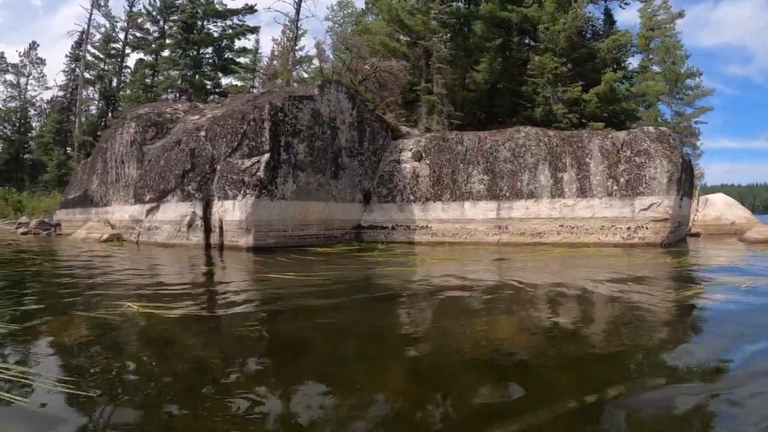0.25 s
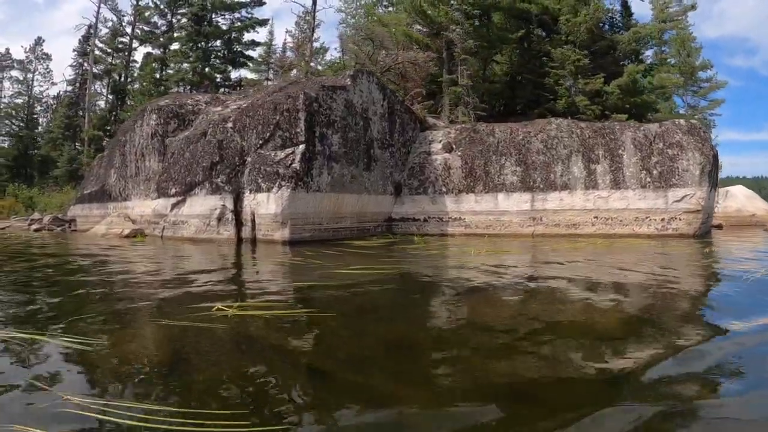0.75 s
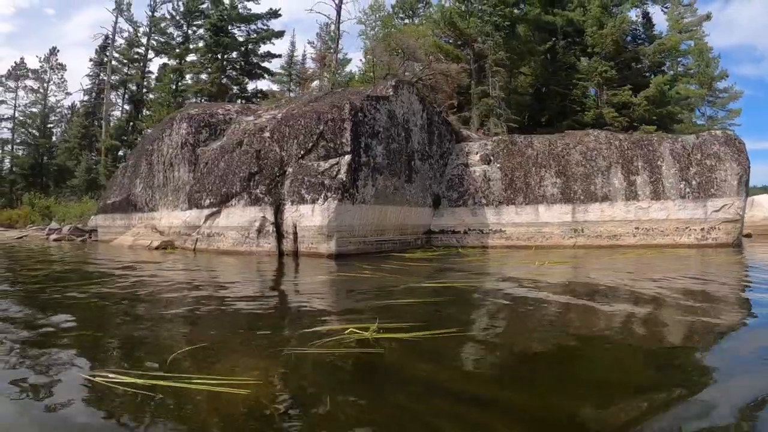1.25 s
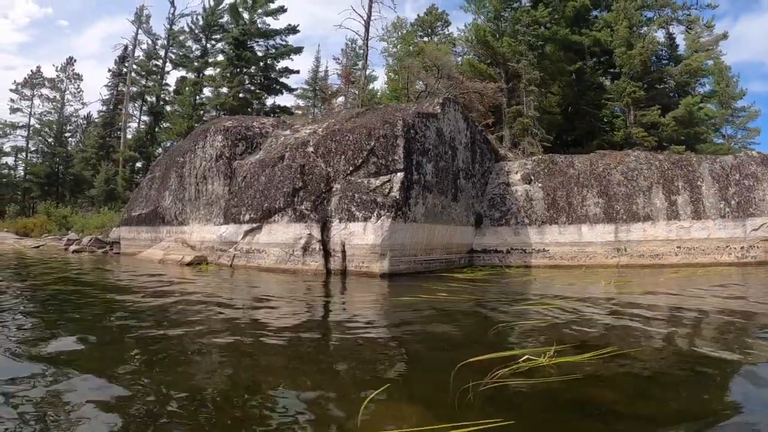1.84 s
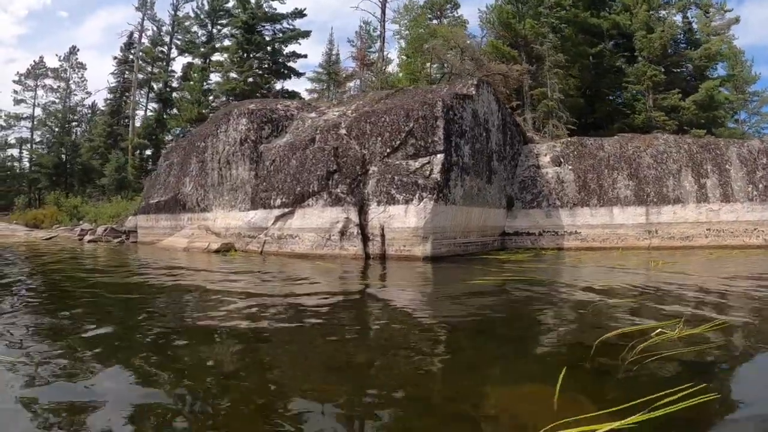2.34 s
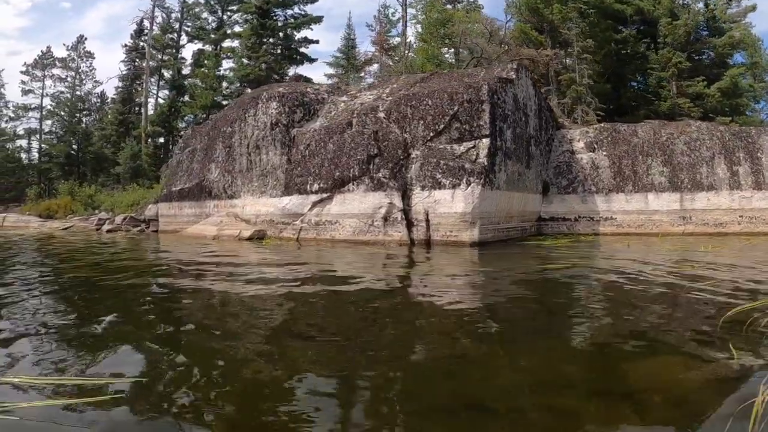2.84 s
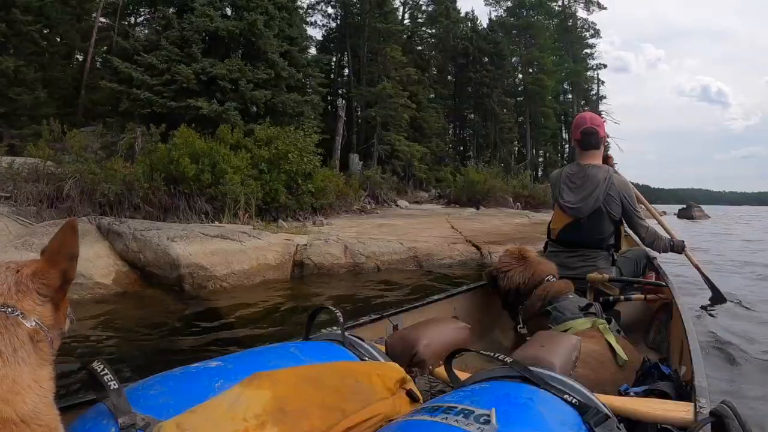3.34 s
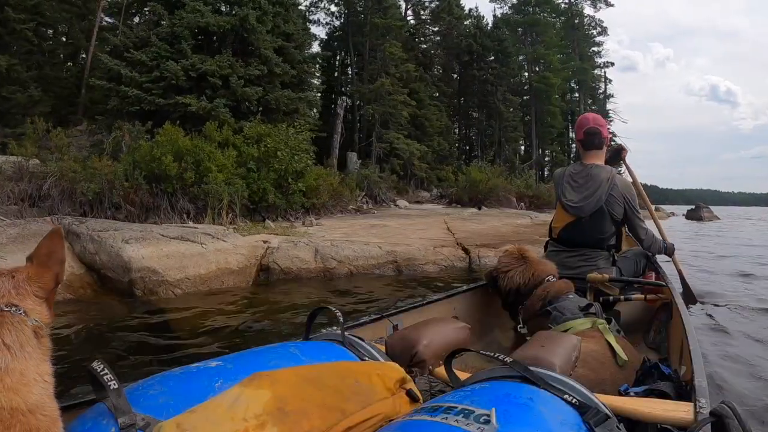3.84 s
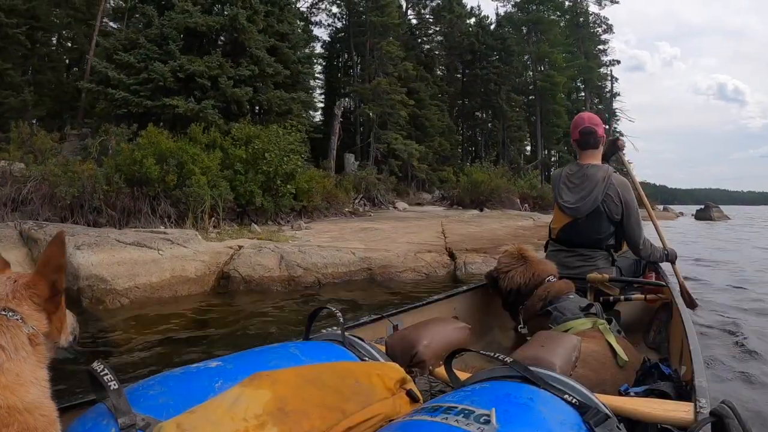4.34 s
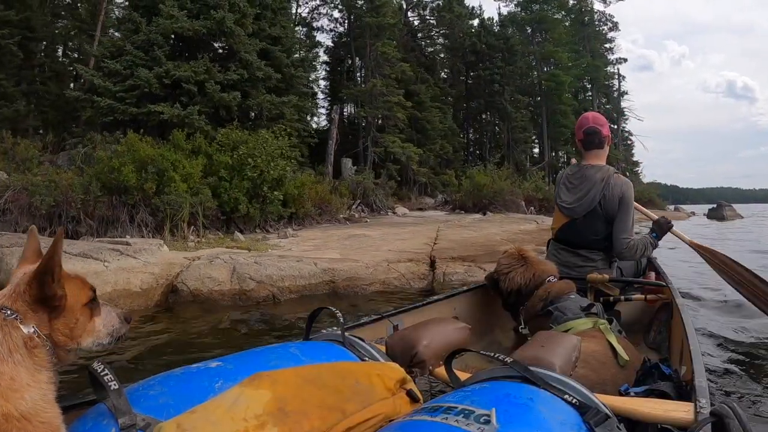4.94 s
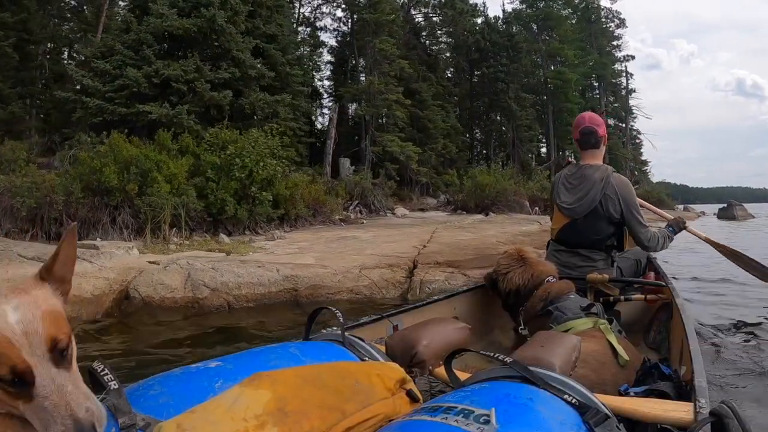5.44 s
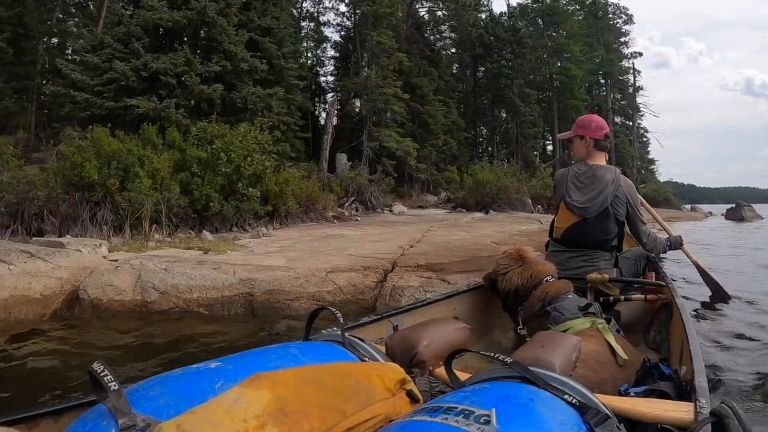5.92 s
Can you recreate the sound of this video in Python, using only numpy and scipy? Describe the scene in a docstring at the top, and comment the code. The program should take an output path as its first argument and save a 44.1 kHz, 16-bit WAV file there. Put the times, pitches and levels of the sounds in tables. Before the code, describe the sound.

Wind thumps against the microphone while a canoe paddle knocks, then plunges through lake water in two close, bubbling strokes, followed by drips and faint strokes.

```python
"""Wind buffets the microphone from the first moment and throughout, as a shaped rumble with single throbs.
A canoe is paddled over a lake: a knock, then two close strokes, and softer ones from the bow.
Each stroke slaps the surface (noise bursts) and folds in a cloud of ringing bubbles (damped sines).
Between strokes the blade drips; eddies gurgle behind it as the water settles (sliding tones and surges).
A faint steady noise is the breeze in the shore trees."""
import sys
import numpy as np
from scipy import signal
from scipy.fft import rfft, irfft
from scipy.io import wavfile
from scipy.ndimage import uniform_filter1d

SR = 44100
rng = np.random.default_rng(int(sys.argv[2]) if len(sys.argv) > 2 else 0)


def transcribe(u):
    """Save the signal u as a 16-bit wav file named by the first command-line argument.

    u: samples, shape (n,) or (channels, n), limited to [-1, 1]; the rate is SR.
    q: integer samples, one column per channel.
    """
    v = np.clip(np.atleast_2d(u).T, -1, 1)
    q = np.round(v * 32767).astype(np.int16)
    wavfile.write(sys.argv[1], SR, q)


N = 272538  # length in samples

# eddies of wind that strike the microphone:
# peak_s, level_db [dB, before trim], throb_hz [Hz at the peak], length_s [s from peak to 1/e]
WIND_EDDIES = [(0.03, -21, 75, 0.0083), (0.2, -25, 65.3, 0.012), (0.153, -28, 79.4, 0.039),
               (0.402, -28.5, 95, 0.04), (0.639, -21, 70, 0.01), (1.171, -17, 181, 0.0083),
               (1.202, -18.5, 70, 0.0095), (1.228, -21, 196, 0.01), (1.246, -18, 120, 0.0066),
               (1.285, -32, 150, 0.013), (1.342, -24, 164, 0.0073), (1.559, -21.5, 106, 0.011),
               (1.959, -20, 63.7, 0.0093), (1.98, -27.5, 225, 0.0062), (2.975, -22.5, 96, 0.019),
               (3.076, -17.5, 220, 0.005), (3.091, -9.5, 106, 0.004), (3.249, -22.5, 80, 0.0074),
               (3.364, -23, 214, 0.0054), (3.919, -19, 83, 0.02), (3.923, -32, 181, 0.042),
               (4.079, -26.5, 195, 0.018), (4.099, -18.5, 90, 0.014), (4.15, -27.5, 178, 0.009),
               (4.525, -27.5, 60.4, 0.025), (4.844, -35, 179, 0.0094), (5.2, -30, 60, 0.0066),
               (5.255, -35, 195, 0.0084)]


def gain_of(db):
    """Turn decibels into an amplitude factor."""
    return 10 ** (np.asarray(db) / 20)


def evened(x):
    """Scale a signal to an average (RMS) strength of 1."""
    return x / np.sqrt(np.mean(x ** 2) + 1e-20)


def read(points, hz):
    """Read a spectrum between its points, joined by straight lines on a log-frequency axis."""
    f, value = np.transpose(points)
    return np.interp(np.log(hz + 1), np.log(f + 1), value)


def add(mix, s, sound):
    """Add a sound to the mix, starting at second s."""
    part = mix[max(round(s * SR), 0):][:len(sound)]
    part += sound[:len(part)]


def noise(points):
    """Steady noise: random values whose spectrum is shaped to the given dB per Hz."""
    spectrum = rfft(rng.standard_normal(N))
    shape = gain_of(read(points, np.fft.rfftfreq(N, 1 / SR)))
    return irfft(spectrum * shape, N) * np.sqrt(SR / 2)


def surge(t, s, db, decay):
    """Power of a surge that swells up to time s and dies away more slowly."""
    rise_share = 0.82  # it rises in this share of its decay time
    shape = 0.94  # 1 is pointed with long tails, 2 is a bell
    away = np.maximum((s - t) / rise_share, t - s) / decay
    return (gain_of(db) * np.exp(-np.abs(away) ** shape)) ** 2


def breeze():
    """Breeze in the shore trees: a faint, steady broadband noise."""
    # its colour: pitch_hz [Hz], level_db [dB per Hz]
    air_colour = [(100, -99.5), (700, -105), (1500, -105), (4000, -109), (8000, -123), (15000, -135)]
    return noise(air_colour)


def gusts(t):
    """Level of the wind rumble in dB: the slow wind plus the wake that each eddy drags with it."""
    # strength of the slow wind: time_s [s], level_db [dB]
    wind_strength = [(0, -32), (.32, -52), (.8, -37.5), (1.1, -43.5), (1.26, -28.5), (1.44, -34),
                     (1.78, -38), (2.15, -34), (2.65, -39.5), (3.25, -34.5), (3.47, -43.5), (3.8, -44.5),
                     (4.15, -44), (4.58, -42), (4.85, -52.5), (5.32, -42), (5.48, -40), (5.66, -48),
                     (6.0, -49.5), (6.1, -37.5)]
    wake_db, wake_stretch = -8, 2.08  # level and length of a wake against its eddy's
    wakes = sum(surge(t, s, db + wake_db, wake_stretch * length) for s, db, _, length in WIND_EDDIES)
    slow_db = np.interp(t, *np.transpose(wind_strength))
    return 10 * np.log10(gain_of(slow_db) ** 2 + wakes)


def wind(level_db=0.0, buffet_db=-3.5, flutter_db=5.5, gust_brightening=0.37, typical_db=-39.5):
    """Turbulence at the microphone port: a rumble that follows the gusts, and single throbbing eddies."""
    # colour of the rumble before its strength is evened: pitch_hz [Hz], level_db [dB per Hz]
    rumble_colour = [(8, -3.5), (28, 3), (60, 1), (110, -5), (180, -9.5), (250, -20.5), (350, -26.5),
                     (600, -42), (1500, -54), (5000, -100)]
    t = np.arange(N) / SR
    rumble = noise(rumble_colour)
    gust_db = np.interp(t, t[::64], gusts(t[::64]))
    rumble = rumble / np.sqrt(uniform_filter1d(rumble ** 2, size=3000) + 1e-12)
    deep = signal.sosfiltfilt(signal.butter(2, 130, fs=SR, output="sos"), rumble)
    flutter = uniform_filter1d(rng.standard_normal(N), size=1100)
    flutter = evened(uniform_filter1d(flutter, size=500))
    # small eddies come in fits, and more so in a strong gust
    small_db = flutter_db * np.clip(flutter, -2, 2) + gust_brightening * (gust_db - typical_db)
    small = (rumble - deep) * gain_of(small_db - 0.5)
    out = (deep + small) * gain_of(level_db + gust_db)
    for s, db, hz, length in WIND_EDDIES:
        u = np.arange(-3 * length, 3 * length, 1 / SR)  # time from the peak
        cycles = hz * u * (1 - 0.076 * u / length)  # slows as the eddy passes
        throb = np.sin(2 * np.pi * (cycles + rng.random()))
        add(out, s + u[0], gain_of(db + buffet_db) * throb * np.exp(-(u / length) ** 2))
    return out


def stir(t):
    """How hard the water is stirred at times t: dB of deep churn, splash and fine spray."""
    # close strokes: enter_s [s], level_db [dB, before mix], settle_s [s]
    strokes = [(0.574, -33, 0.79), (2.576, -37, 0.68)]
    # eddies that gurgle behind a blade: peak_s [s], level_db [dB, before mix], decay_s [s]
    swirls = [(.645, -33.5, 0.072), (.815, -28.5, 0.025), (1.05, -35.5, 0.13), (1.195, -31.5, 0.023),
              (1.305, -43, 0.026), (1.52, -37.5, 0.055), (1.62, -33.5, 0.014), (2.05, -75, 0.24),
              (2.565, -28.5, 0.01), (2.72, -32.5, 0.068), (3.11, -36, 0.084), (3.4, -34.5, 0.017),
              (3.57, -43.5, 0.076), (3.69, -50, 0.02), (3.93, -50, 0.13), (4.68, -43.5, 0.049),
              (5.205, -51.5, 0.049), (5.5, -62, 0.1), (6.02, -62, 0.16)]
    # water thrown as a blade dips or lifts: peak_s [s], level_db [dB, before mix], decay_s [s]
    splashes = [(.591, -23.5, 0.0071), (.615, -28.5, 0.02), (.69, -38.5, 0.082), (.8, -45, 0.028),
                (1.77, -54.5, 0.095), (1.98, -48.5, 0.0097), (2.39, -53, 0.016), (2.575, -42, 0.037),
                (2.67, -35.5, 0.021), (2.745, -41.5, 0.039), (2.93, -46, 0.13), (3.415, -54, 0.022),
                (3.57, -56.5, 0.048), (3.725, -44.5, 0.058), (4.41, -45, 0.017), (4.6, -51, 0.047),
                (4.86, -57.5, 0.035), (5.14, -52, 0.02), (5.185, -48, 0.027), (5.45, -58, 0.066),
                (5.74, -50, 0.061), (5.94, -55, 0.035), (6.1, -62, 0.11)]
    # fine drops shed by a blade swinging forward: peak_s [s], level_db [dB, before mix], decay_s [s]
    sprinkles = [(.17, -59, 0.28), (.38, -49, 0.069), (2.3, -64.5, 0.35), (2.47, -50.5, 0.08),
                 (2.862, -48, 0.0032), (4.24, -64.5, 0.14), (4.48, -64, 0.052), (5.16, -61, 0.056),
                 (5.86, -60, 0.14)]
    # each triple below is (deep churn, splash, fine spray)
    calm_db = (-86, -76.5, -69.5)  # ripples along the hull
    stroke_mix_db = (9, -0.5, -22)  # at the height of the pull
    settle_db = (26.5, 28.5, 34)  # lost within one settling time
    settle_curve = (0.52, 0.4, 1)  # below 1, most of the fall comes early
    swirl_mix_db, splash_mix_db, sprinkle_mix_db = (4.5, -13.5, -48), (-9.5, 0.5, -10), (-49, -8, 8.5)
    pull_s = 0.14  # the pull builds for this long, then the water settles
    power = np.multiply.outer(gain_of(calm_db) ** 2, np.ones_like(t))
    for s, db, settle in strokes:
        pull = np.clip((t - s) / pull_s, 0, 1)
        age = np.maximum(t - s - pull_s, 0) / settle
        kinds = zip(stroke_mix_db, settle_db, settle_curve)
        power += np.array([pull * gain_of(db + mix - fall * age ** curve) for mix, fall, curve in kinds]) ** 2
    for rows, mix in ((swirls, swirl_mix_db), (splashes, splash_mix_db), (sprinkles, sprinkle_mix_db)):
        power += np.multiply.outer(gain_of(mix) ** 2, sum(surge(t, *row) for row in rows))
    return 10 * np.log10(power)


def water_db(s, hz):
    """Power per Hz of stirred water: churn makes the big bubbles, splash the middling, spray the tiny."""
    # colour of the water: pitch_hz [Hz], level_db [dB per Hz relative to the stirring level]
    water_colour = [(120, -56.5), (220, -23), (300, -28), (550, -31.5), (1000, -28.5), (1700, -27),
                    (2400, -31.5), (3200, -31.5), (4200, -40), (4800, -38), (6400, -41.5), (8000, -49),
                    (10300, -51.5), (12000, -65), (15500, -63)]
    churn, splash, spray = stir(s)
    deep = read([(800, 0.92), (2000, 0.036)], hz)  # share of churn at this pitch
    fine = read([(3500, 0.095), (6200, 0.85)], hz)  # share of spray
    stirring = deep * churn + (1 - deep - fine) * splash + fine * spray
    return read(water_colour, hz) + stirring


def bubble(hz, ring, rise, swell):
    """A damped sine that swells as it pinches off and climbs in pitch as it nears the surface."""
    t = np.arange(int(6 * ring * SR) + 2) / SR
    tone = np.sin(2 * np.pi * hz * t * (1 + rise * t / ring / 2))
    return tone * np.exp(-t / ring) * (1 - np.exp(-t / (swell * ring)))


def splat(hz, octaves, decay, onset):
    """A drop or blade strikes water: a burst that builds as contact spreads, peaks after one decay and dies."""
    age = np.arange(SR // 10) / SR - decay  # time since full contact
    burst = rng.standard_normal(len(age)) * np.exp(np.minimum(age / onset, -age) / decay)
    away = 2 * np.log2((np.fft.rfftfreq(len(age), 1 / SR) + 1) / hz) / octaves
    band = evened(1 / np.sqrt(1 + away ** 6))
    sound = irfft(rfft(burst) * band, len(age))[:SR // 12]
    return sound / np.linalg.norm(sound) * np.sqrt(decay * SR / 2)  # energy grows with the decay time


def knock(tick_hz=3500, tick_octaves=1.37, tick_decay=0.0053, build=0.00073):
    """The paddle ticks against the gunwale before the first plunge: a hard tick and short ringing modes."""
    # what the knock rings with: pitch_hz [Hz], level_db [dB relative to ring_db], t60_s [s to fall 60 dB]
    modes = [(316, -7.5, 0.1), (1330, -15, 0.046), (3420, -10, 0.044), (4650, -2.5, 0.025),
             (4900, -6, 0.029), (6340, -2.5, 0.022), (6700, -14, .03), (7600, -10, 0.027)]
    knock_s, ring_db, tick_db = 0.554, -24, -30
    t, out = np.arange(SR // 8) / SR, np.zeros(N)
    for hz, db, t60 in modes:
        envelope = gain_of(ring_db + db - 60 * t / t60) * (1 - np.exp(-t / build))
        add(out, knock_s, envelope * np.sin(2 * np.pi * (hz * t + rng.random())))
    tick = splat(tick_hz, tick_octaves, tick_decay, onset=0.043)
    add(out, knock_s - tick_decay, gain_of(tick_db) * tick)
    return out


def trickle(count=26, spread_db=3.5, octaves=0.854, ring_at_1k=0.0039, rise=0.036, swell=0.29):
    """Drops fall back from the blade one after another, each leaving a bubble that chirps upward."""
    # runs of drops (times approximate): start_s [s], end_s [s], level_db [dB, middle], pitch_hz [Hz, middle]
    runs = [(0.854, 1.648, -29.5, 1008), (3.098, 3.851, -39, 1160), (4.354, 4.929, -41.5, 2670),
            (5.099, 5.449, -46.5, 1600), (5.403, 6.147, -43.5, 2190)]
    out = np.zeros(N)
    for start, end, db, middle_hz in runs:
        for k, (late, pitch, size, glide) in enumerate(rng.uniform(-1, 1, (count, 4))):
            hz = middle_hz * 2 ** (octaves * pitch)
            # the longer it rings, the further it climbs
            ring = ring_at_1k * (hz / 1000) ** -.6 * (1 + glide / 2)
            when = start + (end - start) * (k + 1.6 * late) / count
            add(out, when, gain_of(db + spread_db * size) * bubble(hz, ring, rise * (1 + glide), swell))
    return out


def glugs(octaves_per_s=10.3, early=0.85, rough=0.12):
    """An air pocket squeezed shut in the blade's wake slides up in pitch, shaken by the water round it."""
    # air pockets: start_s [s], pitch_hz [Hz at the start], level_db [dB], length_s [s]
    pockets = [(0.943, 695, -34, 0.019), (2.98, 720, -14, 0.016), (3.113, 442, -28, 0.03),
               (3.489, 574, -45, 0.051), (3.561, 430, -30.5, 0.023), (3.654, 495, -46.5, .065),
               (3.751, 922, -40, 0.026), (5.185, 802, -51, 0.027), (5.673, 994, -44, 0.036)]
    out = np.zeros(N)
    for s, hz, db, length in pockets:
        t = np.arange(0, length, 1 / SR)
        envelope = np.sin(np.pi * (t / length) ** early) ** 2
        shake = 1 + rough * evened(uniform_filter1d(rng.standard_normal(SR // 8), size=150))[:len(t)]
        tone = np.sin(2 * np.pi * np.cumsum(hz * 2 ** (octaves_per_s * t)) / SR)
        add(out, s, gain_of(db) * envelope * shake * tone)
    return out


def patter(level_db=-9.5, per_s=110.0, spread_db=4.0, decay=0.0012, low_hz=2000, high_hz=8000,
           octaves=0.97, count=12):
    """Droplets crackle on the surface: dry ticks of several sizes, as strong as the water is stirred."""
    ticks = np.zeros(N)
    for tick_hz in np.geomspace(low_hz, high_hz, count):
        lands = rng.random(N) < per_s / count / SR
        landings = lands * gain_of(spread_db * np.minimum(rng.exponential(1, N), 2.5))
        tick = np.sqrt(tick_hz) * splat(tick_hz, octaves, decay, onset=0.4)
        ticks += signal.oaconvolve(landings, tick)[:N]
    hz, s, z = signal.stft(evened(ticks), SR, nperseg=256, noverlap=192)
    z = z * gain_of(level_db + water_db(s[None], hz[:, None]))
    return signal.istft(z, SR, nperseg=256, noverlap=192)[1][:N] * np.sqrt(high_hz)


def swish(level_db=-6.0, patchy_db=5.0, flicker_db=3.5, tearing=0.082, torn_db=-40.5):
    """Torn water around the blade: a hiss that comes in patches and spurts."""
    hz, s, z = signal.stft(rng.standard_normal(N), SR, nperseg=256, noverlap=192)
    patches = uniform_filter1d(rng.standard_normal(z.shape), size=6, axis=0)  # smooth over pitch
    patches = evened(uniform_filter1d(patches, size=6, axis=1))  # and over time
    spurts = evened(uniform_filter1d(rng.standard_normal(len(s)), size=5))
    tear_db = tearing * (stir(s)[1] - torn_db)  # gentle water bubbles more than it hisses
    hiss_db = level_db + tear_db + water_db(s[None], hz[:, None])
    z = z * gain_of(hiss_db + patchy_db * patches + flicker_db * spurts)
    return signal.istft(z, SR, nperseg=256, noverlap=192)[1][:N] * np.sqrt(SR / 2)


def bubble_cloud(count=60000, level_db=-1.0, calm_spread_db=8.5, crowded_spread_db=3.5, ring_at_1k=0.00454,
                 rise=0.033, swell=0.23, sparse=.04, full_db=-40.0, thinning_db=20.0, tiny_db=-3.0):
    """Countless small bubbles ring as damped sines, crowded during a stroke and scattered in calm water."""
    when, pitch, luck, glide, damping = rng.random((count, 5)).T
    s = when * N / SR
    octaves = np.log2(8500 / 230)  # pitches run from 230 to 8500 Hz
    hz = 230 * 2 ** (octaves * pitch)
    splash_db = stir(s)[1]
    crowd = np.clip(gain_of((splash_db - full_db) * 10 / thinning_db), sparse, 1)
    chance = np.clip(crowd * (hz / 3000) ** 0.23, .01, 1)  # big bubbles are rarer
    ring = ring_at_1k * (hz / 1000) ** -.6 * (.5 + damping)  # and ring longer
    # in a crowd, no one bubble stands out
    spread_db = calm_spread_db + (crowded_spread_db - calm_spread_db) * crowd
    size = gain_of(spread_db * (np.minimum(rng.exponential(1, count), 2.7) - 1.5))
    # each one's share of time and bandwidth
    energy = hz * octaves * np.log(2) * N / SR / (count * chance)
    faint_db = read([(3000, 0), (6000, tiny_db)], hz)  # the tiniest ring more faintly
    peak = gain_of(level_db + faint_db + water_db(s, hz)) * size * 2 * np.sqrt(energy / ring)
    out = np.zeros(N)
    for k in np.flatnonzero(luck < chance):
        add(out, s[k] - ring[k], peak[k] * bubble(hz[k], ring[k], rise * 2 * glide[k], swell))
    return out


def plops(level_db=2.0, rise=0.012, impact_db=-19.0, impact_octaves=0.5, impact_decay=0.0026):
    """Bubbles that stand out one by one, each set ringing by a faint impact brighter than its tone."""
    # bubbles and drips heard one by one, low glugs to high plinks:
    # start_s [s], pitch_hz [Hz at the start], level_db [dB, before trim], ring_s [s to 1/e]
    single_bubbles = [(.1, 1550, -36.5, 0.0021), (.382, 3580, -34, 0.0027), (.403, 3100, -18.5, 0.0012),
                      (0.465, 2520, -39.5, 0.0032), (.592, 1210, -16, 0.0046), (.602, 1785, -8.5, 0.0022),
                      (.615, 3140, -22, 0.0024), (0.653, 1180, -19, 0.0036), (.671, 477, -16, .0035),
                      (.711, 1020, -4, 0.0011), (.725, 285, -23, .031), (.805, 960, -21, 0.0057),
                      (.82, 1130, -12.5, 0.0016), (0.851, 1430, -25, 0.0023), (.894, 1000, -22.5, 0.0051),
                      (.98, 1040, -23.5, 0.006), (1.019, 815, -24.5, 0.011), (1.05, 510, -24, 0.0074),
                      (1.126, 331, -23, 0.017), (1.162, 907, -22, 0.0024), (1.233, 2360, -32, 0.0024),
                      (1.301, 798, -25, 0.0094), (1.502, 960, -24, 0.0023), (1.516, 412, -29, .016),
                      (1.525, 1320, -30, .0025), (1.541, 1220, -27, 0.0026), (1.6, 866, -30, 0.0032),
                      (1.637, 910, -36, 0.0052), (1.972, 1880, -36.5, 0.0028), (2.322, 2710, -39, 0.0022),
                      (2.393, 1970, -29, 0.0025), (2.433, 1730, -21.5, 0.00038), (2.47, 4680, -30, 0.0016),
                      (2.529, 3710, -28.5, 0.0053), (2.552, 1300, -23, 0.0032), (2.654, 1280, -17, 0.0036),
                      (2.672, 510, -5.5, 0.0019), (2.673, 1146, -14.5, 0.0046), (2.678, 269, -25.5, 0.025),
                      (2.721, 335, -22, 0.021), (2.741, 746, -18.5, 0.013), (2.756, 390, -18.5, 0.011),
                      (2.79, 1305, -21, 0.0038), (2.826, 1380, -15.5, 0.0015), (2.872, 2800, -29, .0025),
                      (2.924, 1210, -19.5, 0.0024), (2.996, 1100, -16.5, 0.003), (3.119, 734, -23, 0.0042),
                      (3.403, 1070, -28, 0.003), (3.44, 1120, -34, 0.0034), (3.523, 1020, -38.5, .004),
                      (3.525, 1770, -38, 0.0041), (3.605, 920, -19.5, 0.0013), (3.719, 1890, -21, 0.00094),
                      (4.238, 3890, -42.5, 0.0029), (4.387, 1350, -33, 0.0024), (4.407, 577, -32, 0.015),
                      (4.411, 1220, -35.5, 0.0042), (4.408, 3550, -34.5, 0.0022),
                      (4.438, 2830, -25, 0.0016), (4.596, 5740, -39.5, 0.0016), (4.637, 2300, -35, 0.0028),
                      (4.662, 554, -38, 0.0075), (4.698, 1400, -29, 0.002), (4.703, 486, -32.5, 0.0056),
                      (4.814, 3500, -42.5, .003), (4.861, 2300, -36, 0.0024), (4.922, 2740, -38.5, 0.0022),
                      (5.002, 1440, -43, 0.0041), (5.027, 1660, -44, 0.0039), (5.132, 3040, -39, .0025),
                      (5.139, 1355, -36.5, 0.0046), (5.193, 950, -36, 0.0026), (5.314, 1980, -35, 0.0012),
                      (5.382, 2970, -42, .002), (5.443, 2760, -36, .0043), (5.456, 3700, -27.5, 0.0019),
                      (5.459, 500, -33, 0.02), (5.662, 2220, -27.5, 0.0013), (5.694, 3230, -24, 0.0022),
                      (5.733, 2960, -22, 0.002), (5.815, 700, -44, 0.0078), (5.884, 2950, -31.5, 0.0014),
                      (5.911, 1740, -37, 0.0033), (5.921, 2270, -34, 0.0023), (5.96, 2750, -32, 0.0018),
                      (5.988, 2900, -36, 0.0023), (6.021, 1870, -40, 0.0039), (6.036, 2400, -34, 0.0015),
                      (6.048, 2080, -33, 0.0024)]
    pinch_s = .0008  # time a bubble takes to pinch off and start ringing
    out = np.zeros(N)
    for s, hz, db, ring in single_bubbles:
        add(out, s, gain_of(db + level_db) * bubble(hz, ring, rise, swell=pinch_s / ring))
        impact = splat(hz * np.sqrt(2), impact_octaves, impact_decay, onset=0.59)
        add(out, s - impact_decay / 2, gain_of(db + impact_db) * impact)
    return out


def slaps(level_db=-4.5, onset=0.12):
    """The blade and the water it throws hit the surface: short bursts of banded noise."""
    # slaps: peak_s [s], level_db [dB, before trim], centre_hz [Hz], decay_s [s], breadth [octaves]
    surface_hits = [(.199, -40, 5130, 0.003, 1.3), (.352, -30, 4600, 0.00084, 0.44),
                    (.385, -44, 5700, 0.0045, 0.52), (0.593, -15.5, 2300, 0.004, 0.74),
                    (0.607, -17, 2600, 0.0032, 1.1), (.687, -15, 3280, 0.0016, 0.56),
                    (.696, -22, 1500, 0.00099, 1.1), (0.713, -21, 3300, 0.0025, 0.35),
                    (.729, -23, 2900, 0.0014, 0.93), (0.752, -14, 1200, 0.0022, 0.87),
                    (0.896, -29, 1400, .002, 1.6), (1.053, -27, 1150, 0.0021, 0.86),
                    (1.162, -22, 980, 0.0019, 0.97), (1.482, -30, 1200, 0.0014, 0.67),
                    (1.505, -22, 1320, 0.0045, 0.49), (1.634, -32.5, 1400, 0.0029, 1.86),
                    (1.761, -32, 1800, .003, 1.25), (2.397, -23.5, 2340, 0.0019, 0.7),
                    (2.529, -26, 2620, 0.0028, 0.47), (2.553, -28, 2200, 0.0038, .9),
                    (2.56, -18.5, 3250, 0.0022, 1.1), (2.601, -23, 1510, 0.0069, 1.15),
                    (2.674, -21, 2500, .0025, 1.12), (2.731, -16.5, 2920, .0015, 0.54),
                    (2.742, -20.5, 2100, 0.0039, 0.89), (2.759, -6, 1330, 0.00128, 0.6),
                    (2.766, -17, 2000, .0015, 0.8), (2.861, -30, 2400, .0025, 1.1),
                    (2.924, -23, 2480, 0.0012, 1.16), (2.936, -36, 2800, .0014, 1.5),
                    (2.979, -21, 1900, 0.001, .7), (2.983, -19.5, 1880, 0.0027, 1.1),
                    (3.013, -25, 1600, 0.00193, 0.71), (3.061, -24, 1200, .003, 1.25),
                    (3.09, -28.5, 2660, .002, 1), (3.353, -31, 900, .003, 0.82),
                    (3.403, -40, 2000, .003, 1.55), (3.607, -30, 1670, .0025, .82),
                    (3.692, -34, 2300, 0.0036, 0.64), (3.72, -24, 1900, 0.002, 0.96),
                    (4.41, -31, 2750, 0.0035, 1.1), (5.105, -36, 3000, 0.0011, 1.65),
                    (5.186, -33, 2330, 0.006, 1.2), (5.457, -26, 2770, 0.0011, 1.14),
                    (5.733, -31.5, 3970, 0.0033, 0.89), (5.832, -35.5, 3800, 0.0038, 1),
                    (5.958, -18, 3030, 0.00052, 0.66), (5.961, -11, 2600, 0.00067, 0.88)]
    out = np.zeros(N)
    for s, db, hz, decay, octaves in surface_hits:
        add(out, s - decay, gain_of(db + level_db) * splat(hz, octaves, decay, onset))
    return out


def hull(x, echo_db=-14.0, t60=0.11):
    """Hull and gear scatter the water's sound back as sparse random echoes that quickly die away."""
    t = np.arange(SR // 4) / SR
    sparse = (rng.random(len(t)) < .06) * (t > .002)
    taps = rng.standard_normal(len(t)) * sparse * gain_of(-60 * t / t60)
    return x + gain_of(echo_db) * signal.oaconvolve(x, taps / np.linalg.norm(taps))[:N]


def scene():
    """Water heard over the hull, wind on the microphone, and the breeze on shore."""
    background = breeze() + wind()
    small_water = knock() + trickle() + glugs() + patter()
    strokes_water = swish() + bubble_cloud() + plops() + slaps()
    return (background + hull(small_water + strokes_water))[None]


def record(dry):
    """The recorder's band limit: a steep filter removes the highest treble."""
    edge_hz = 15700
    low_pass = signal.firwin(511, edge_hz, window=("kaiser", 9), fs=SR)
    return signal.oaconvolve(dry, low_pass[None], "same")


dry = scene()
out = record(dry)
transcribe(out)
```